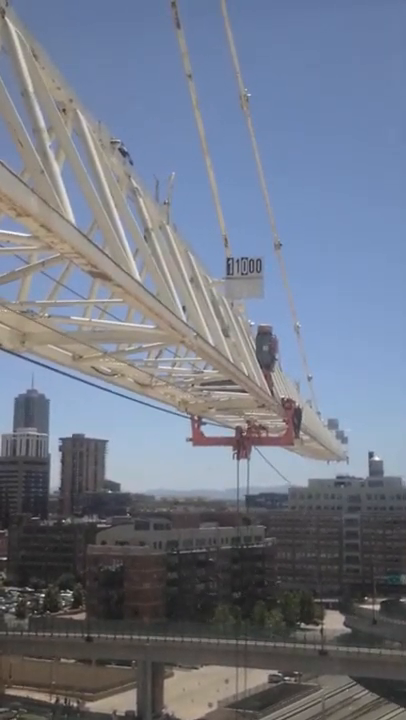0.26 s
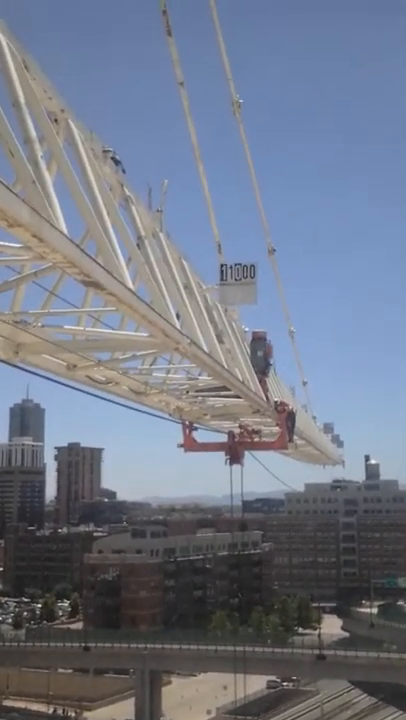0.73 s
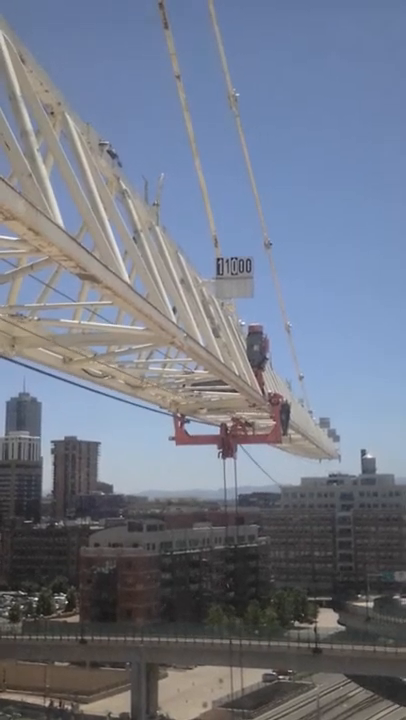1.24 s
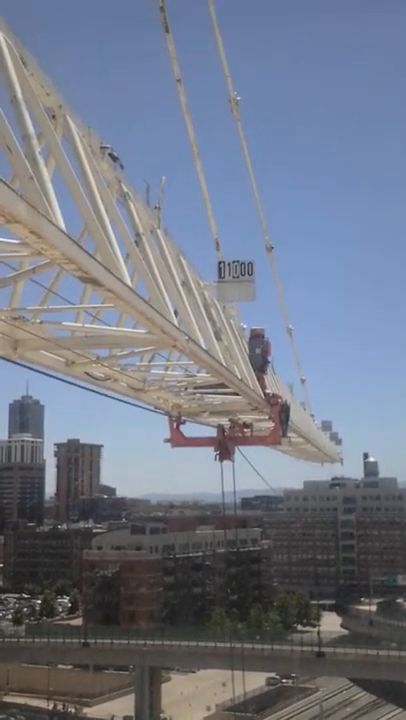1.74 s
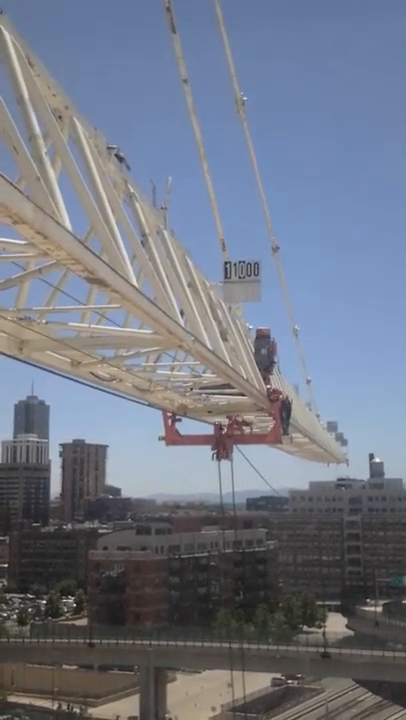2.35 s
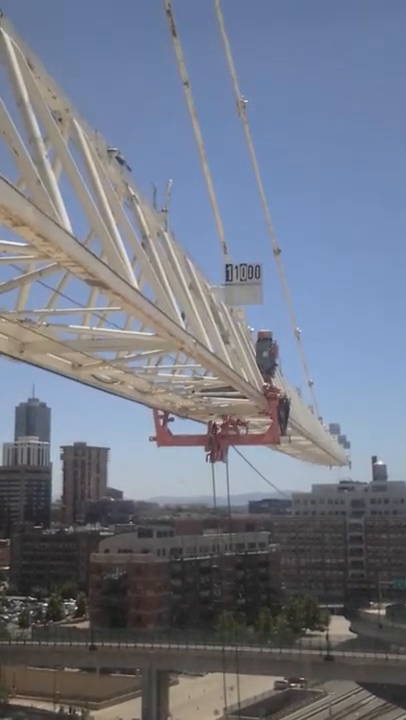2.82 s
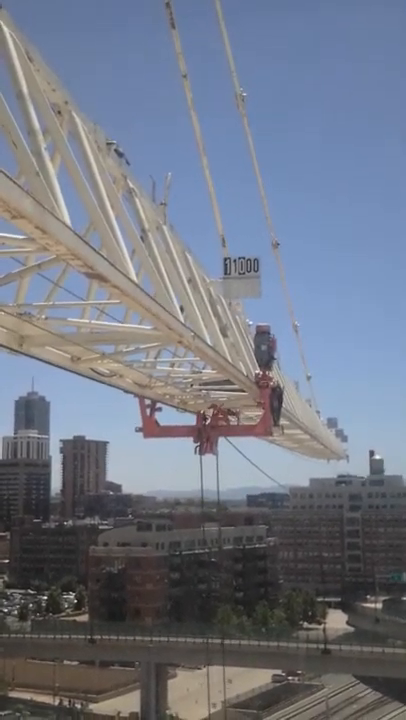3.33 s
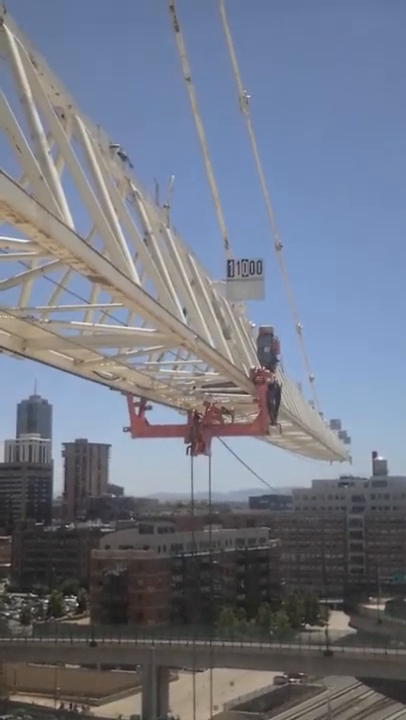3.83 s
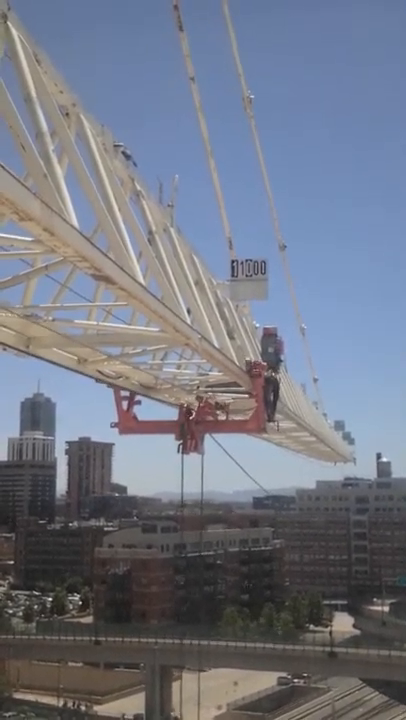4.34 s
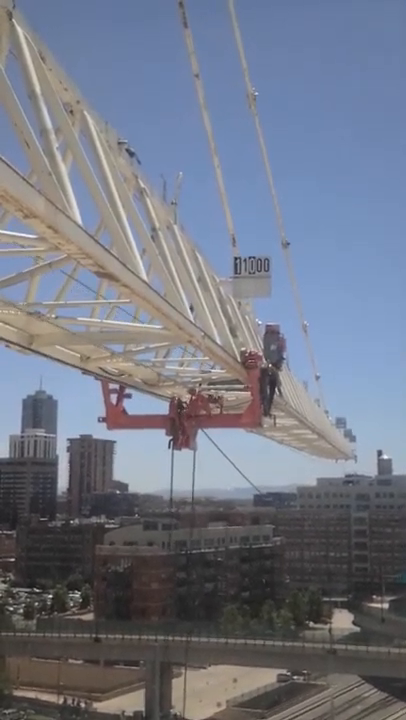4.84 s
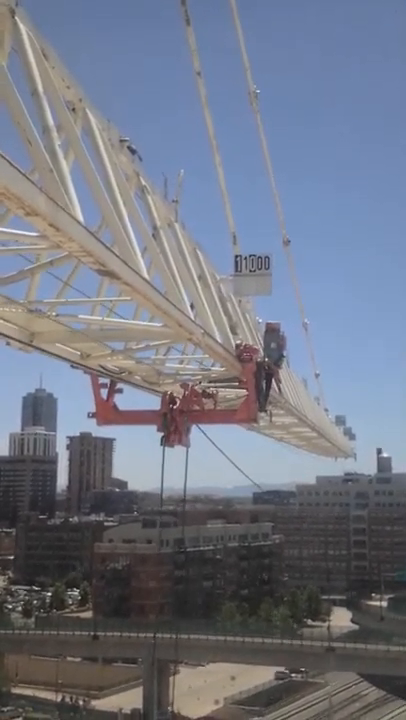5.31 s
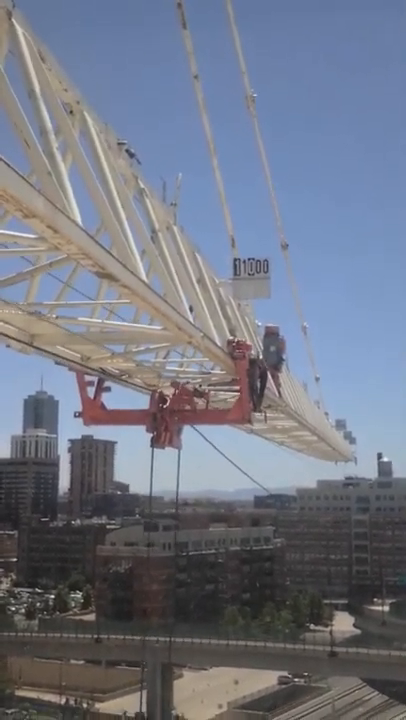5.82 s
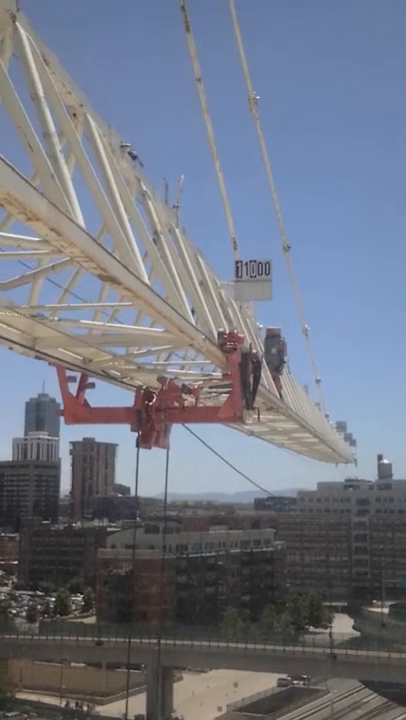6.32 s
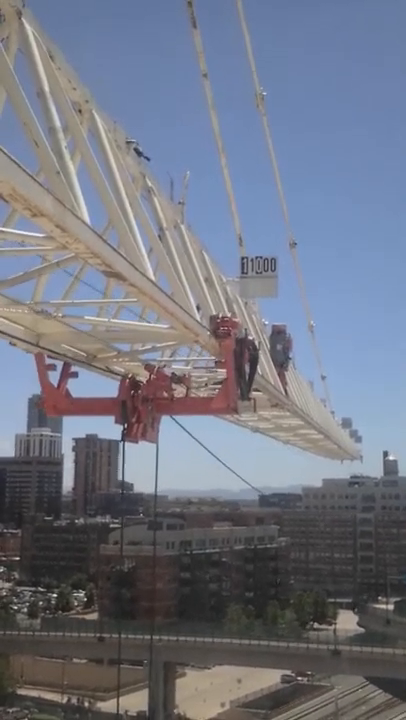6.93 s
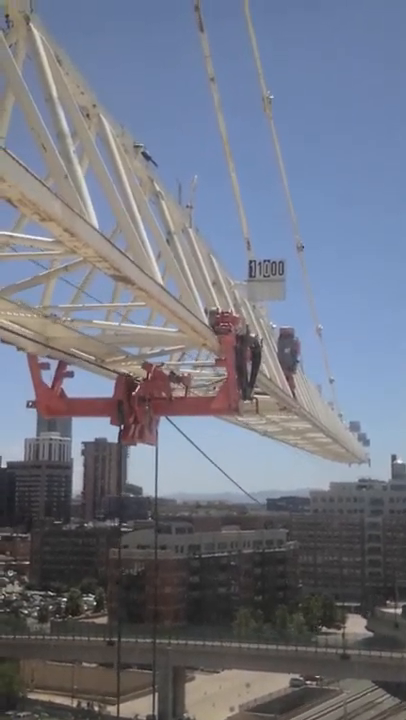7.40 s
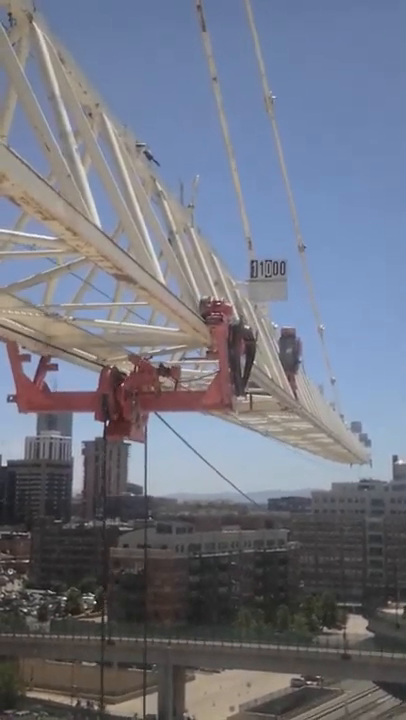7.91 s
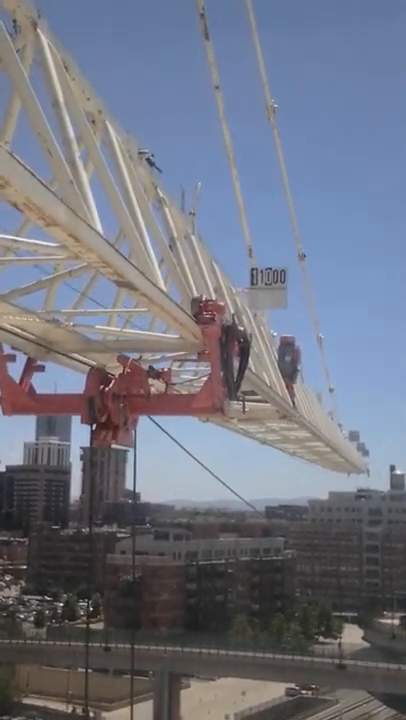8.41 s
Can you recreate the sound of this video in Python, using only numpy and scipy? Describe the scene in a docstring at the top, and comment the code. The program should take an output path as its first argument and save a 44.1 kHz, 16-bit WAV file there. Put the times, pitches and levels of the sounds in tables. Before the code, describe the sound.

Inside a crane cab, a deep motor hum runs throughout, slightly unsteady, over soft fan hiss, a faint high whine and low distant traffic rumble. Sleeve cloth rustles in the first second; at about 0.5 s the lever gives sharp, bright clicks and a light tap, with a low jolt. A dry scrape with short, juddering squeals follows from 0.8 to 1 s. Near 1.9 s the winch pulls, booming through the steelwork, with dull clunks around 1.9 and 2.7 s. Gears whirr and sing in surges until nearly 5 s, over a quiet rope rasp. Clicks return at 4.7 and 5.2 s, with a tiny squeak. Another swell spans 6 to 7 s. Clicks come at 6.7, 7.3, 7.7, 8.1 and 8.5 s, amid rustling, a clunk at 7.7 and a small fitting knock at 8.2. A hand slide and squeaks peak abruptly near 8.6 s.

```python
"""A motor hums steadily in the cab of a tower crane while the trolley runs in along the jib: drifting sines.
The winch shakes the steelwork: shaped noise booms and whirrs, and tones rise, with pulls and jolts.
The control lever clicks through its notches as noise bursts; slip noise scrapes, rustles and rasps.
Bent sines squeal and squeak; filtered noise gives clunks, a knocked fitting, fan hiss and city rumble."""
import sys
import numpy as np
from scipy import signal
from scipy.fft import rfft, irfft
from scipy.io import wavfile
from scipy.ndimage import uniform_filter1d, map_coordinates

SR = 44100
rng = np.random.default_rng(int(sys.argv[2]) if len(sys.argv) > 2 else 0)


def persist_wave(psi):
    """Save psi, clipped to +-1, as 16-bit WAV."""
    counts = np.round(np.clip(psi, -1, 1) * 32767).astype(np.int16)
    wavfile.write(sys.argv[1], SR, np.atleast_2d(counts).T)


N = 381906
TIME_S = np.arange(N) / SR
TOP_HZ = 14650

MOTOR_HZ, MOTOR_DB = 85.9, -21.5
# drive hum at any load: pitch_hz, level_db, wander_db
HUM_TONES = [(58.9, -37.5, 5.5), (118.6, -34.5, 3)]

# winch drive tones: pitch_hz, level_re_boom_db, wander_db
DRIVE_TONES = [(106.4, -14, 2), (118.45, -7, 2.5), (124.9, -10, 2), (135, -14.5, 6.5), (166.5, -15, 3),
               (179.2, -21.5, 5.5), (222.8, -29, 8)]
# steelwork boom spectrum: freq_hz, relative_density_db
BOOM_SPECTRUM = [(28, -65), (40, -34), (58, -16.5), (76, -8), (97, -2), (125, 0.5), (146, -9), (160, -15.5),
                 (175, -10), (205, -18), (250, -32), (360, -26), (700, -71)]
# gear noise spectrum: freq_hz, relative_density_db
GEAR_SPECTRUM = [(150, -21), (320, 3.5), (400, 2), (530, -3.5), (640, -1.5), (800, -19.5), (880, -8),
                 (1180, -10.5), (1450, -25.5), (2000, -21), (4000, -44)]
# gear housing resonances: freq_hz, width_hz, gain_db
HOUSING_MODES = [(307, 9.9, 1), (455, 31, 2.5), (638, 21, -14), (966.4, 19, -2.5), (1560, 28, -14),
                 (1765, 18, -13.5)]
# gear mesh tones: pitch_hz, relative_level_db, wander_db
MESH_TONES = [(283.5, -14, 3.5), (306, -10, 4), (317.6, -13, 4), (452.8, -5, 3), (464, -8.5, 4),
              (636, -21, 5)]
# winch pulls, levels before the trims in winch(): start_s, length_s, boom_db, whirr_db, mesh_db
PULLS = [(1.85, .5, -19, -38, -34.5), (2.76, 0.16, -20, -33.5, -30), (2.953, .5, -24, -38.5, -41),
         (3.474, 0.47, -18.5, -33.5, -30.5), (3.954, 0.84, -17, -34, -30), (5.977, 0.93, -17.5, -35, -33.5),
         (7.15, 0.296, -30.5, -39, -43), (7.685, 0.49, -23, -33.5, -44)]
# load jolts, level before the boom trim: start_s, level_db
JOLTS = [(.55, -16), (2.02, -11), (2.78, -10.5), (4.919, -15.5), (6.8, -20)]
# idle levels before the same trims
IDLE_BOOM_DB, IDLE_WHIRR_DB, IDLE_MESH_DB = -24.5, -35, -40
# gears fall quiet soon after a pull, the steelwork booms on
PULL_RISE_S, GEAR_T60_S, SWAY_T60_S = 0.12, 0.64, 11.2
JOLT_RISE_S, JOLT_T60_S = 0.022, 1.27
JOLT_RATTLE_DB = -23.5  # share of a jolt that reaches the gears
# winch frame resonances: freq_hz, width_hz, relative_gain_db
FRAME_MODES = [(140.6, 31, -2), (178.6, 13, -1), (203.5, 18, -5)]
# thin drive whine: idle_pitch_hz, level_db, wander_db
WHINE_TONES = [(3032, -63, 2.5), (3010, -64.5, 3.5), (2320, -65, 0.5)]

# cab fan spectrum: freq_hz, relative_density_db
FAN_SPECTRUM = [(200, 2), (1000, 5), (1450, -0.5), (2250, -1.5), (2650, -3.5), (3000, -3.5), (3700, -5.5),
                (5700, -5), (7500, -12), (9000, -16), (11000, -24), (14500, -32.5)]
# city rumble spectrum: freq_hz, relative_density_db
CITY_SPECTRUM = [(22, -14), (30, -23), (39, -7), (55, -2), (72, 5.5), (150, -15), (200, -2.5), (270, -12),
                 (500, -25.5)]

# sleeve rustle spectrum: freq_hz, relative_density_db
CLOTH_SPECTRUM = [(1500, -1), (3000, -6), (5000, -4), (6100, -8), (8500, -5.5), (11500, -17), (13000, -16),
                  (14500, -27)]
# rustle sheen: freq_hz, width_hz, gain_db
CLOTH_MODES = [(5460, 180, 5), (6570, 330, -2.5), (10300, 290, -2.5), (11560, 270, -6.5)]
# sleeve movements: start_s, length_s, level_db
RUSTLES = [(-0.07, 0.6, -46.5), (.42, 0.38, -41.5), (.83, 0.22, -43), (7.21, 0.29, -44),
           (7.62, 0.18, -42.5), (8.26, 0.53, -42.5)]
RUSTLE_RISE_S, RUSTLE_T60_S = 0.056, 0.11
# resonances of the hand sliding on the grip: freq_hz, width_hz, relative_gain_db
SLIDE_MODES = [(1150, 250, 0.5), (2780, 330, -4), (4030, 300, -7.5), (4620, 820, 2), (7450, 1200, 0),
               (8200, 350, -1), (9050, 850, -6), (13300, 1400, -6)]
SLIDE_PEAK_S, SLIDE_DB, SLIDE_RISE_DB_PER_S, SLIDE_FALL_DB_PER_S = 8.625, -25.5, 330, 490

# lever strike colour: freq_hz, gain_db
LEVER_COLOUR = [(400, -19.5), (1800, -24), (2700, -14.5), (3700, -8), (5000, -7), (5900, 1), (7200, -5),
                (9800, -6.5), (11700, -13.5), (12400, -17), (14500, -19)]
# lever modes, before modes_db: freq_hz, width_hz, gain_db
LEVER_MODES = [(3177, 40, -2), (4800, 45, -8), (5670, 60, -6), (5730, 39, -1), (6050, 81, -13),
               (6050, 65, -5), (8700, 64, -14)]
# low body of the lever console: freq_hz, width_hz, gain_db
CONSOLE_MODES = [(900, 1200, -5), (2310, 920, -12), (3130, 440, -5.5), (3750, 1300, 1.5)]
# notch click then latch snap, levels before gain_db: start_s, click_db, latch_delay_s, latch_db, body_share_db
NOTCHES = [(.537, -14, .0185, -10, -6), (4.726, -13, 0.016, -18, -22), (5.238, -17.5, 0.014, -14, -19),
           (6.696, -13.5, 0.012, -19, -22), (7.279, -17, 0.016, -15.5, -13.5),
           (7.735, -13.5, 0.0078, -19, -12), (8.1306, -16, 0.0083, -18, -34),
           (8.461, -17.5, 0.0058, -24, -4.5)]
# light taps of the lever in its play, level before gain_db: start_s, level_db, body_share_db
TAPS = [(0.5289, -17.5, -24), (0.613, -28, -4), (5.279, -21.5, -2), (7.33, -29, -4), (8.352, -37, -20)]
NOTCH_T60_S, TAP_T60_S = 0.115, 0.085

# modes of the scraped part: freq_hz, width_hz, relative_gain_db
SCRAPE_MODES = [(787, 35, 1), (940, 36, 6), (1044, 39, 2), (1210, 32, 1), (1370, 30, -1), (1600, 64, 2),
                (1730, 40, 3.5), (1860, 90, -4), (2200, 60, 2), (2360, 68, -4), (2550, 36, -3)]
# dry scrape strokes: start_s, length_s, level_db
SCRAPES = [(.783, 0.11, -35.5), (.9, 0.071, -34.5)]
SCRAPE_RISE_S, SCRAPE_T60_S = 0.021, 0.62
# squeals of single scraped modes: start_s, length_s, start_pitch_hz, level_db
SQUEALS = [(.785, 0.042, 1062, -43), (.785, 0.065, 1173, -43), (.78, 0.037, 2375, -41.5),
           (.79, .045, 1910, -46), (.825, 0.07, 1740, -42), (.87, 0.12, 1040, -42), (.9, .065, 2350, -40),
           (.915, 0.061, 1785, -40.5), (.945, 0.044, 1577, -46), (.953, 0.026, 2405, -42)]
SQUEAL_RISE_S, SQUEAL_T60_S, SQUEAL_SAG_HZ_PER_S = 0.022, 0.25, 94

# panel modes rung by a clunk: freq_hz, width_hz, relative_gain_db
PANEL_MODES = [(620, 68, 18), (988, 63, 12.5), (1135, 71, 11), (1297, 60, 3), (1570, 80, 1)]
# dull steelwork clunks: start_s, level_db, rise_s, t60_s
CLUNKS = [(1.94, -35.5, 0.045, 0.21), (2.715, -31.5, 0.017, 0.9), (2.757, -46, 0.012, 0.25),
          (7.69, -33.5, 0.017, 0.54)]

# rope drum resonances: freq_hz, width_hz, relative_gain_db
DRUM_MODES = [(560, 46, 0), (652, 49, 1), (884, 38, 2), (1070, 110, -12.5), (1145, 55, -2)]
# rope rasping on the drum: start_s, length_s, level_db
RASPS = [(2.9, 1.96, -44.5), (6.55, 0.22, -41)]
RASP_RISE_S, RASP_T60_S = 0.09, 0.35

# skin squeaks on the grip: start_s, length_s, start_pitch_hz, level_db
SQUEAKS = [(5.187, .009, 6350, -40), (8.531, .01, 8750, -45), (8.531, .011, 10080, -44),
           (8.54, 0.03, 7240, -42), (8.553, 0.012, 9090, -39), (8.59, .012, 8250, -36),
           (8.601, 0.028, 4870, -33.5)]
SQUEAK_RISE_S, SQUEAK_T60_S, SQUEAK_SAG_HZ_PER_S = 0.01, 0.068, 7700

# loose cab fitting: freq_hz, width_hz, relative_gain_db
FITTING_MODES = [(1060, 50, 2), (2410, 350, -10), (3300, 600, -6), (4020, 70, -1)]
FITTING_S, FITTING_DB, FITTING_RISE_S, FITTING_T60_S = 8.208, -33, 0.005, 0.11


def undb(db):
    """Decibels to gain."""
    return 10 ** (np.asarray(db) / 20)


def unit(x):
    """Scale to rms 1."""
    return x / np.sqrt(np.mean(x ** 2))


def noise():
    """White noise."""
    return rng.standard_normal(N)


def decay(age_s, t60_s):
    """Exponential gain, 60 dB down after t60_s."""
    return np.exp(-np.log(1000) * age_s / t60_s)


def walk(rate_hz):
    """Slow random signal of rms 1: levels held 1 / rate_hz seconds, smoothed twice."""
    k = int(SR / rate_hz)
    held = np.repeat(noise()[:N // k + 1], k)
    return unit(uniform_filter1d(uniform_filter1d(held, k), k)[:N])


def colour(x, points):
    """Minimum-phase filter through (freq_hz, gain_db), falling 12 dB per octave beyond both ends."""
    size = 32768
    hz, db = np.transpose(points)
    octave = np.log2(np.maximum(np.fft.rfftfreq(size, 1 / SR), 1))
    outside = np.abs(octave - np.clip(octave, np.log2(hz[0]), np.log2(hz[-1])))
    response_db = np.interp(octave, np.log2(hz), db) - 12 * outside
    # folding the cepstrum makes the filter causal
    cepstrum = irfft(np.log(undb(response_db)))
    cepstrum[1:size // 2] *= 2
    cepstrum[size // 2 + 1:] = 0
    return signal.fftconvolve(x, irfft(np.exp(rfft(cepstrum))))[:N]


def ring(x, modes):
    """Parallel resonators (freq_hz, width_hz, gain_db) driven by x."""
    out = 0
    for hz, width_hz, db in modes:
        b, a = signal.iirpeak(hz, hz / width_hz, fs=SR)
        out = out + undb(db) * signal.lfilter(b, a, x)
    return out


def lowpass(x, hz):
    """Steep treble damping."""
    return signal.sosfilt(signal.butter(4, hz, fs=SR, output="sos"), x)


def slips(rate_hz, spread_db):
    """Friction: tiny random slips of uneven size, rms 1."""
    hits = rng.random(N) < rate_hz / SR
    return unit(hits * noise() * undb(spread_db * noise()))


def tone(hz, drift):
    """Sine of rms 1 whose pitch drifts by a small share."""
    cycles = np.cumsum(hz * (1 + drift * walk(6))) / SR
    return np.sqrt(2) * np.sin(2 * np.pi * (cycles + rng.random()))


def chord(tones, drift, wander_rate_hz):
    """Tones (pitch_hz, level_db, wander_db) that swell and fade independently."""
    return sum(tone(hz, drift) * undb(db + wander_db * walk(wander_rate_hz)) for hz, db, wander_db in tones)


def swells(events, rise_s, t60_s):
    """Gain of events (start_s, length_s, level_db) that rise, hold and decay; overlaps add in power."""
    power = 0
    for start_s, length_s, db in events:
        age_s = TIME_S - start_s
        rise = np.clip(age_s / rise_s, 0, 1)
        release = decay(np.maximum(age_s - length_s, 0), t60_s)
        power = power + (undb(db) * rise * release) ** 2
    return np.sqrt(power)


def squeaks(events, rise_s, t60_s, sag_hz_per_s, jitter, jitter_rate_hz):
    """A rubbing contact catches and sings briefly at a ragged, sinking pitch."""
    out = 0
    for start_s, length_s, hz, db in events:
        pitch_hz = hz - sag_hz_per_s * np.clip(TIME_S - start_s, 0, 2 * length_s)
        cycles = np.cumsum(pitch_hz * (1 + jitter * walk(jitter_rate_hz))) / SR
        envelope = swells([(start_s, length_s, db)], rise_s, t60_s)
        out = out + np.sqrt(2) * np.sin(2 * np.pi * cycles) * envelope
    return out


def motor(waver_db=0.93):
    """Near-constant motor speed fills the cab with one low note over the drive hum."""
    note = tone(MOTOR_HZ, drift=0.0067) * undb(MOTOR_DB + waver_db * walk(8.8))
    return note + chord(HUM_TONES, drift=0.0086, wander_rate_hz=2.96)


def winch_load():
    """Boom and gear whirr levels in dB, before trims: pulls and jolts raise both above idle."""
    boom_pulls = [(start_s, length_s, boom_db) for start_s, length_s, boom_db, _, _ in PULLS]
    whirr_pulls = [(start_s, length_s, whirr_db) for start_s, length_s, _, whirr_db, _ in PULLS]
    sway = swells(boom_pulls, PULL_RISE_S, SWAY_T60_S)
    whirr = swells(whirr_pulls, PULL_RISE_S, GEAR_T60_S)
    jolts = swells([(start_s, JOLT_RISE_S, db) for start_s, db in JOLTS], JOLT_RISE_S, JOLT_T60_S)
    boom_power = undb(IDLE_BOOM_DB) ** 2 + sway ** 2 + jolts ** 2
    whirr_power = undb(IDLE_WHIRR_DB) ** 2 + whirr ** 2 + (undb(JOLT_RATTLE_DB) * jolts) ** 2
    return 10 * np.log10(boom_power), 10 * np.log10(whirr_power)


def winch(boom_trim_db=-4.5, gear_trim_db=-4.5, mesh_trim_db=-4, flutter_db=1):
    """Load drives the steelwork boom and drive tones; gears whirr, and their mesh sings out in pulls."""
    load_db, whirr_db = winch_load()
    boom = unit(colour(noise(), BOOM_SPECTRUM)) + chord(DRIVE_TONES, drift=0.00755, wander_rate_hz=7)
    housing = lowpass(ring(noise(), HOUSING_MODES), hz=2290)
    gears = unit(colour(noise(), GEAR_SPECTRUM) + housing)
    mesh_pulls = [(start_s, length_s, mesh_db) for start_s, length_s, _, _, mesh_db in PULLS]
    singing = np.hypot(undb(IDLE_MESH_DB), swells(mesh_pulls, PULL_RISE_S, GEAR_T60_S))
    mesh = chord(MESH_TONES, drift=0.012, wander_rate_hz=12) * singing * undb(mesh_trim_db)
    boom = boom * undb(load_db + boom_trim_db)
    gears = gears * undb(whirr_db + gear_trim_db + flutter_db * walk(25))
    return boom + gears + mesh


def frame(idle_db=-39, swell_db_per_db=1.66):
    """The winch frame drones, growing faster than the gear noise as load rises."""
    _, whirr_db = winch_load()
    drone = unit(lowpass(ring(noise(), FRAME_MODES), hz=239))
    return drone * undb(idle_db + swell_db_per_db * (whirr_db - IDLE_WHIRR_DB))


def whine(sag_per_db=0.004):
    """The drive sings thinly and loses a small share of its speed per dB of gear load."""
    _, whirr_db = winch_load()
    speed = 1 - sag_per_db * uniform_filter1d(whirr_db - IDLE_WHIRR_DB, size=SR // 4)
    tones = [(hz * speed, db, wander_db) for hz, db, wander_db in WHINE_TONES]
    return chord(tones, drift=0.003, wander_rate_hz=18)


def fan(level_db=-42.0):
    """Smooth hiss of air through the duct."""
    return unit(colour(noise(), FAN_SPECTRUM)) * undb(level_db)


def city(level_db=-37, swell_db=0.4):
    """Low rumble of distant traffic, wavering slightly."""
    return unit(colour(noise(), CITY_SPECTRUM)) * undb(level_db + swell_db * walk(2.1))


def hand(flicker_db=1.75):
    """Slips of cloth rustle softly; the hand's slide on the grip swells to a peak and breaks off."""
    cloth = colour(slips(rate_hz=17000, spread_db=3.0), CLOTH_SPECTRUM) + ring(noise(), CLOTH_MODES)
    sleeve = unit(cloth) * swells(RUSTLES, RUSTLE_RISE_S, RUSTLE_T60_S)
    past_peak_s = TIME_S - SLIDE_PEAK_S
    slope_db = np.minimum(SLIDE_RISE_DB_PER_S * past_peak_s, -SLIDE_FALL_DB_PER_S * past_peak_s)
    slide = unit(ring(slips(rate_hz=8000, spread_db=4.0), SLIDE_MODES))
    grip = slide * undb(SLIDE_DB + slope_db)
    return (sleeve + grip) * undb(flicker_db * walk(60))


def strikes():
    """Lever blows as (start_s, level_db, t60_s, body_share_db): two per notch, one per tap."""
    blows = []
    for start_s, click_db, delay_s, latch_db, body_db in NOTCHES:
        blows.append((start_s, click_db, NOTCH_T60_S, body_db))
        blows.append((start_s + delay_s, latch_db, NOTCH_T60_S, body_db))
    return blows + [(start_s, db, TAP_T60_S, body_db) for start_s, db, body_db in TAPS]


def lever(crack_s=0.0032, tail_db=0.0, gain_db=4.5, modes_db=-3, echo_top_hz=11000, grain_db=2.0):
    """Each strike is a brief bright crack, then the grainy, duller echo of the glazed cab."""
    age_s = np.arange(SR // 4) / SR
    sharp, body = np.zeros((2, N + len(age_s)))
    crack = (age_s / crack_s) ** 2 * np.exp(1 - (age_s / crack_s) ** 2)
    for start_s, db, t60_s, body_db in strikes():
        tail = undb(tail_db) * (1 - np.exp(-age_s / crack_s)) * decay(age_s, t60_s)
        contact, echo, sizes = rng.standard_normal((3, len(age_s)))
        echo = lowpass(unit(echo * undb(grain_db * sizes)), echo_top_hz)
        blow = undb(db + gain_db) * (crack * contact + tail * echo)
        span = slice(int(start_s * SR), int(start_s * SR) + len(age_s))
        sharp[span] += blow
        body[span] += blow * undb(body_db)
    sharp, body = sharp[:N], body[:N]
    bright = colour(sharp, LEVER_COLOUR) + undb(modes_db) * ring(sharp, LEVER_MODES)
    return bright + lowpass(ring(body, CONSOLE_MODES), hz=5300)


def squeal(judder_db=2.5):
    """Single modes of the scraped part lock in and squeal with a judder."""
    song = squeaks(SQUEALS, SQUEAL_RISE_S, SQUEAL_T60_S, SQUEAL_SAG_HZ_PER_S,
                   jitter=0.0113, jitter_rate_hz=300)
    return song * unit(undb(judder_db * walk(220)))


def scrape(judder_db=1, shift_db=2, bend=0.0074):
    """Dense stick and slip rings modes that waver separately and bend as the contact moves."""
    rub = slips(rate_hz=6300, spread_db=3.5) * undb(judder_db * walk(110))
    body = sum(ring(rub, [mode]) * undb(shift_db * walk(30.4)) for mode in SCRAPE_MODES)
    # uneven playback speed bends all modes together
    position = np.cumsum(1 + bend * walk(40.6))
    bent = map_coordinates(body, [position], order=1, mode="mirror")
    return unit(lowpass(bent, hz=2950)) * swells(SCRAPES, SCRAPE_RISE_S, SCRAPE_T60_S)


def clunks():
    """Soft blows that swell and die away in the panels."""
    envelope = 0
    for start_s, db, rise_s, t60_s in CLUNKS:
        age_s = np.maximum(TIME_S - start_s, 0)
        rise = np.minimum(age_s / rise_s, 1)
        envelope = envelope + undb(db) * rise * decay(np.maximum(age_s - rise_s, 0), t60_s)
    return unit(lowpass(ring(noise(), PANEL_MODES), hz=1800)) * envelope


def rope(flutter_db=2.0):
    """Rope slips rasp on the resonant drum, with a fluttering level."""
    rasp = unit(lowpass(ring(slips(rate_hz=3000, spread_db=5.0), DRUM_MODES), hz=1500))
    return rasp * swells(RASPS, RASP_RISE_S, RASP_T60_S) * undb(flutter_db * walk(15))


def skin():
    """Skin catches on the grip in brief, fast-sinking squeaks."""
    return squeaks(SQUEAKS, SQUEAK_RISE_S, SQUEAK_T60_S, SQUEAK_SAG_HZ_PER_S,
                   jitter=0.03, jitter_rate_hz=720)


def fitting():
    """A loose fitting is knocked once: noise through its modes in a short, pitched ring."""
    knock = swells([(FITTING_S, FITTING_RISE_S, FITTING_DB)], FITTING_RISE_S, FITTING_T60_S)
    return unit(lowpass(ring(noise(), FITTING_MODES), hz=5000)) * knock


def scene():
    """Everything heard from the seat."""
    crane = motor() + winch() + frame() + whine() + clunks() + rope()
    cab = fan() + hand() + lever() + squeal() + scrape() + skin() + fitting()
    return (crane + cab + city())[None]


def record(dry):
    """Steep low-pass: nothing much is left above TOP_HZ."""
    return signal.sosfilt(signal.ellip(10, 0.2, 80, TOP_HZ, fs=SR, output="sos"), dry)


dry = scene()
out = record(dry)
persist_wave(out)
```